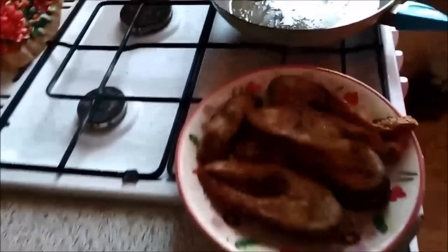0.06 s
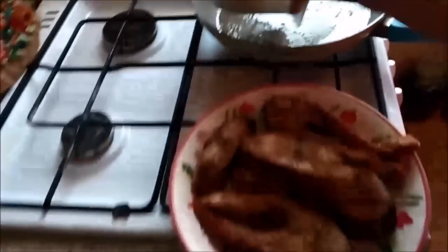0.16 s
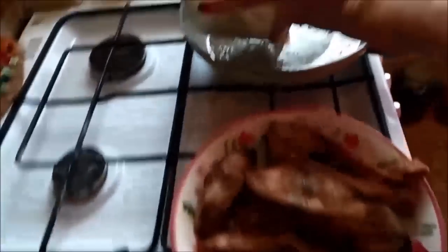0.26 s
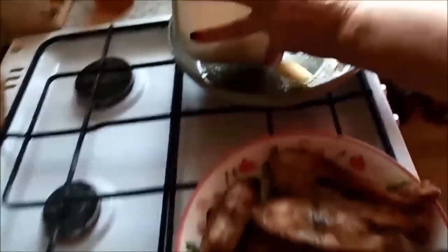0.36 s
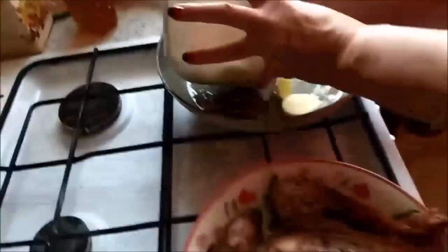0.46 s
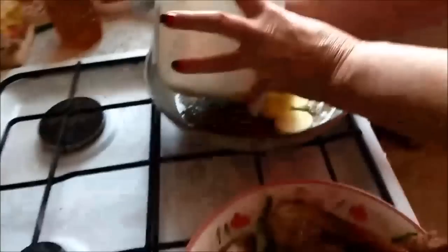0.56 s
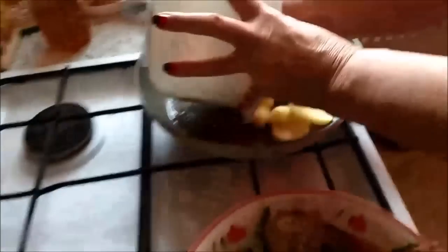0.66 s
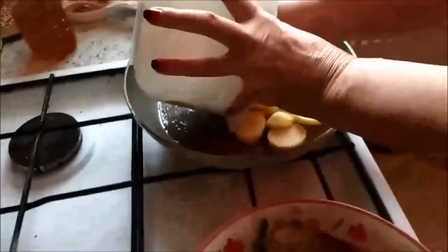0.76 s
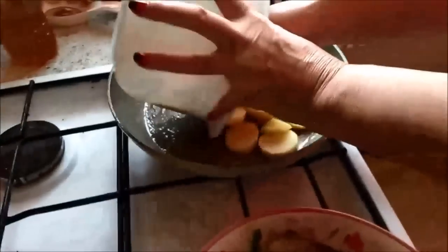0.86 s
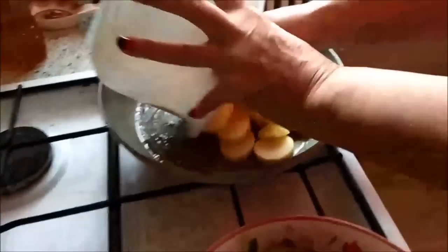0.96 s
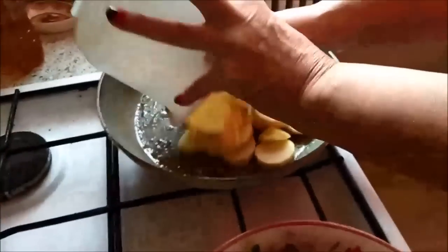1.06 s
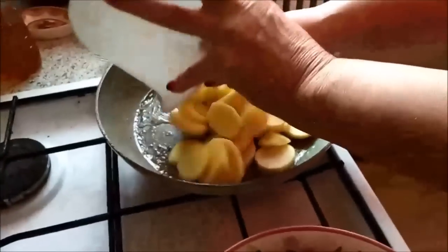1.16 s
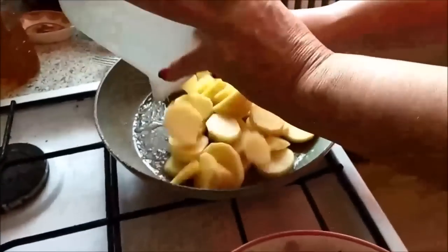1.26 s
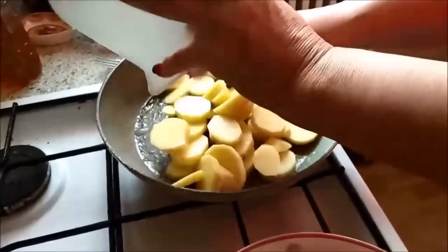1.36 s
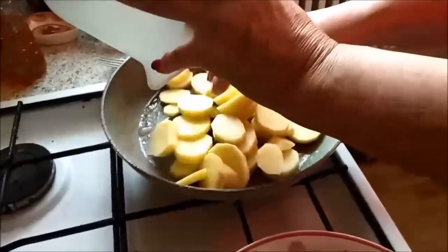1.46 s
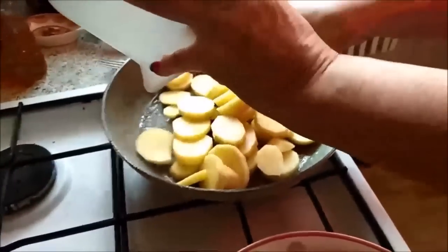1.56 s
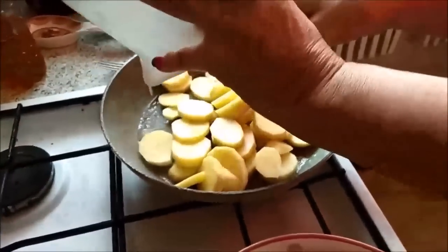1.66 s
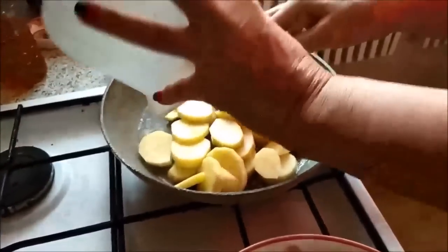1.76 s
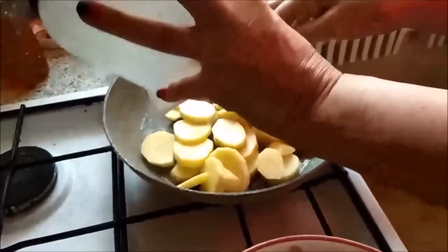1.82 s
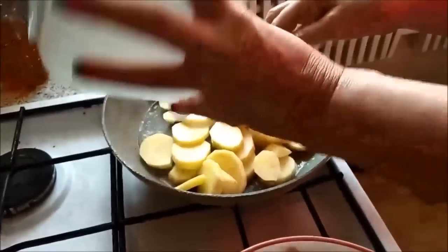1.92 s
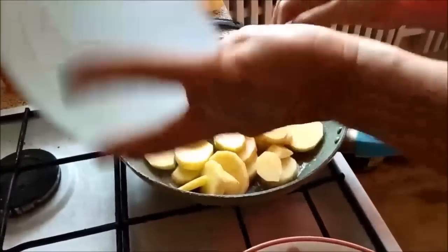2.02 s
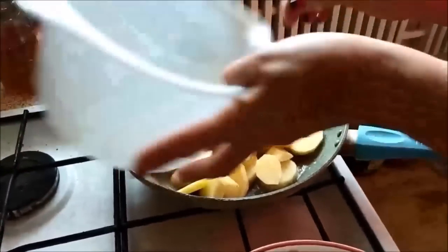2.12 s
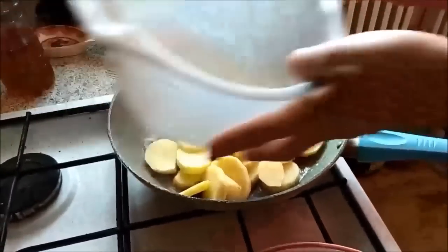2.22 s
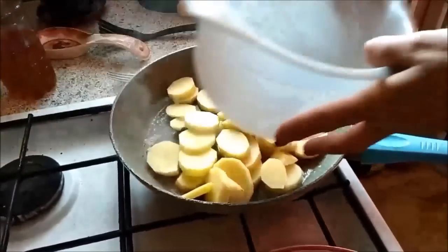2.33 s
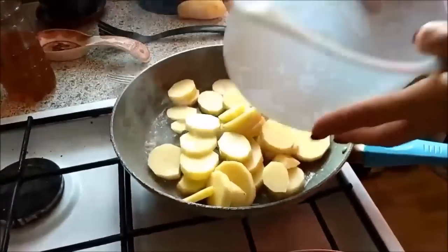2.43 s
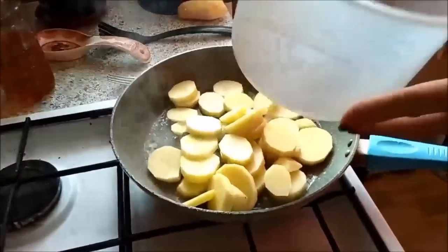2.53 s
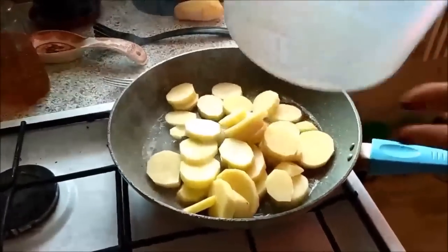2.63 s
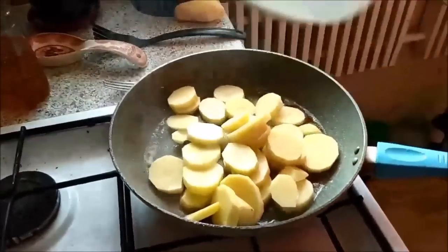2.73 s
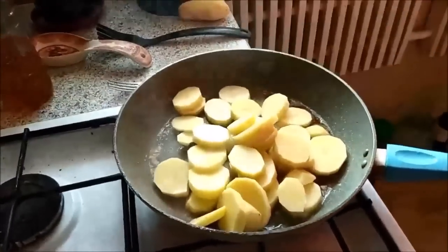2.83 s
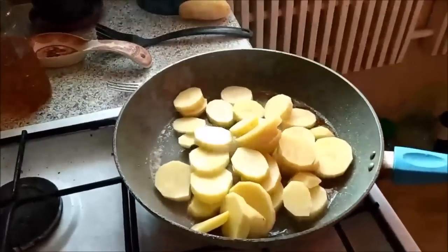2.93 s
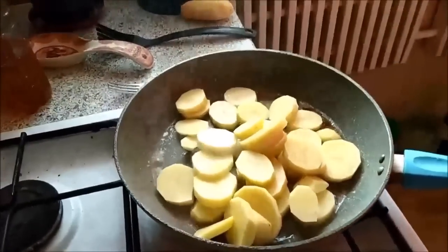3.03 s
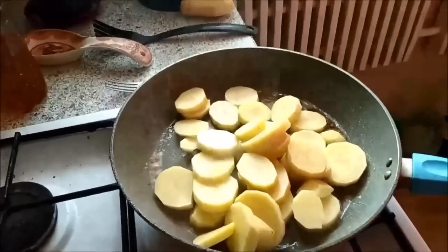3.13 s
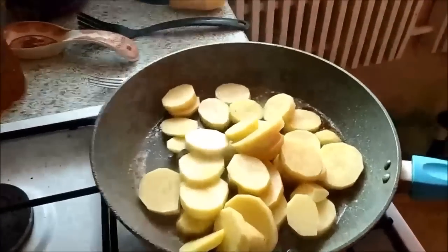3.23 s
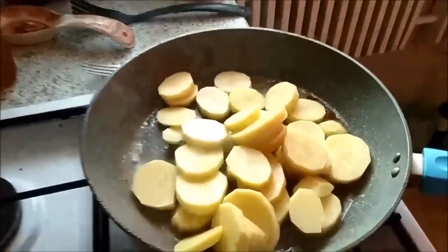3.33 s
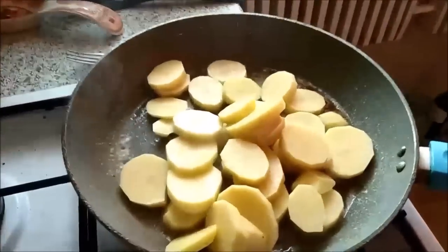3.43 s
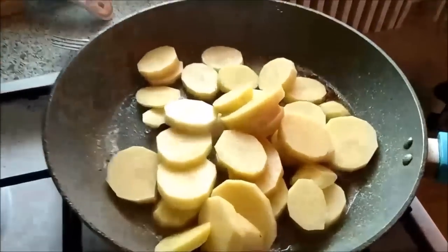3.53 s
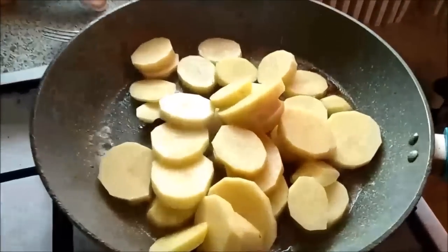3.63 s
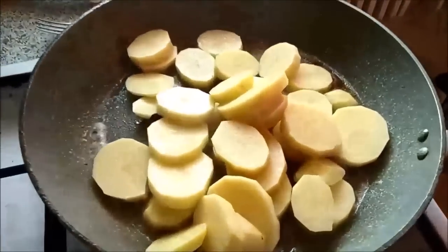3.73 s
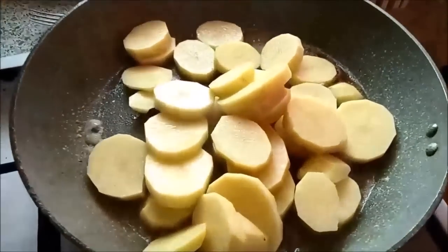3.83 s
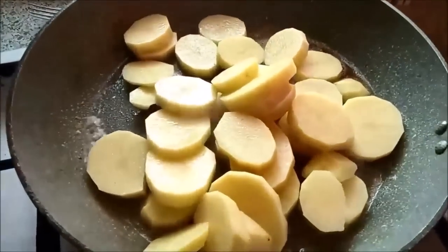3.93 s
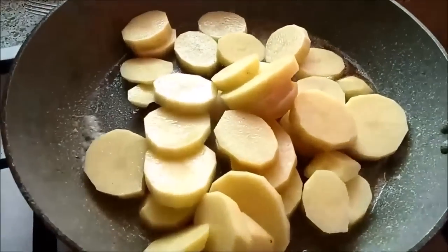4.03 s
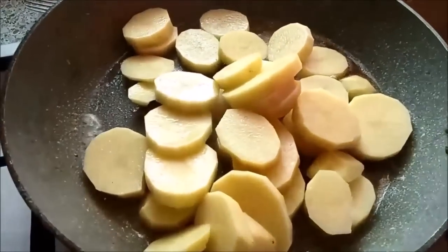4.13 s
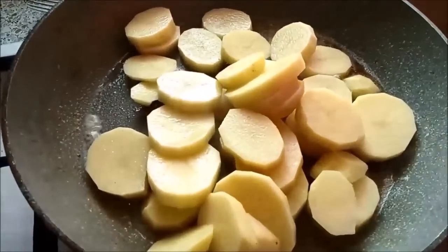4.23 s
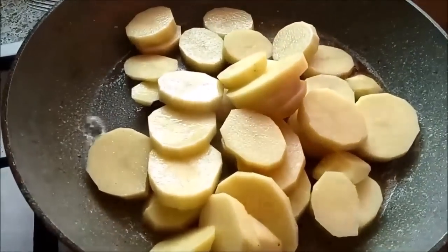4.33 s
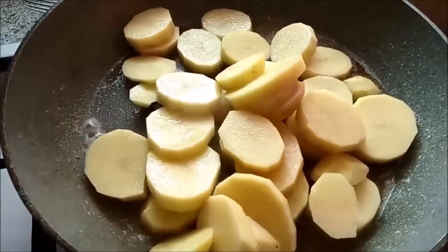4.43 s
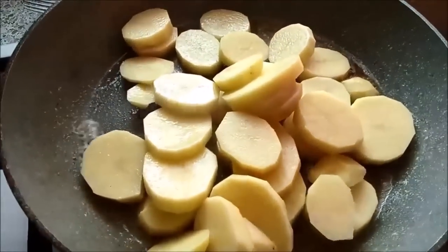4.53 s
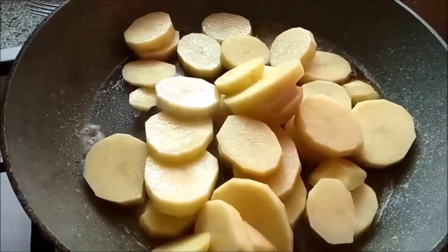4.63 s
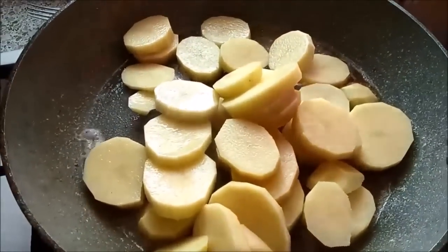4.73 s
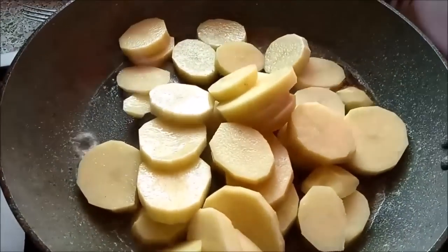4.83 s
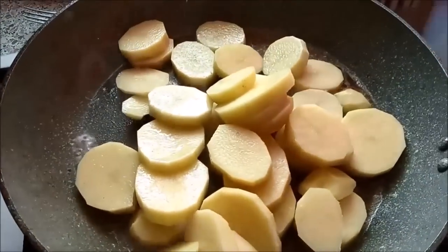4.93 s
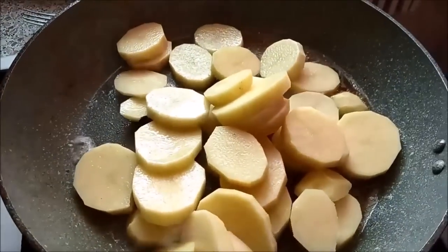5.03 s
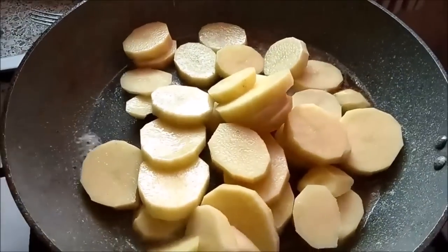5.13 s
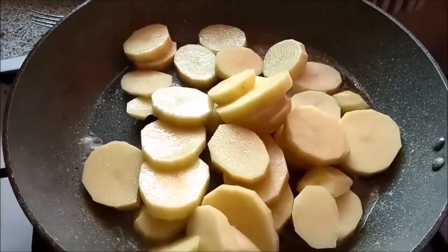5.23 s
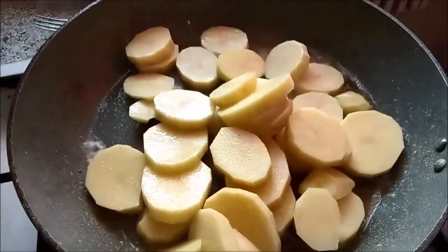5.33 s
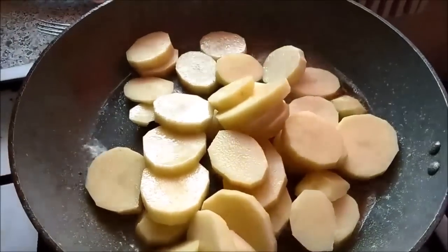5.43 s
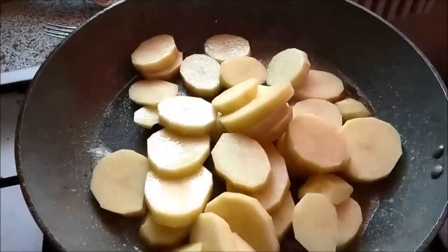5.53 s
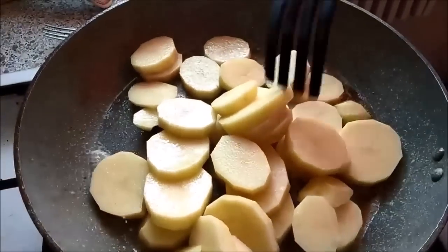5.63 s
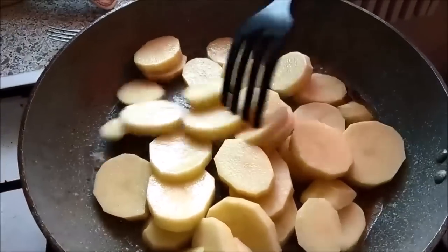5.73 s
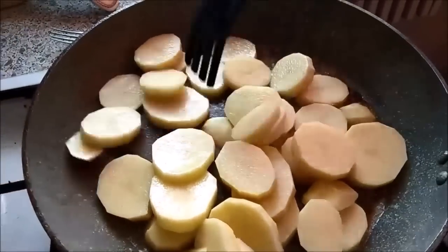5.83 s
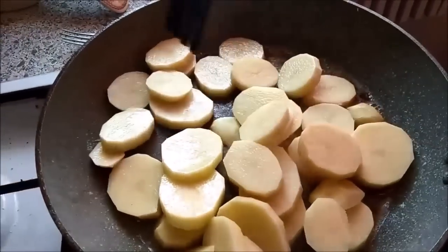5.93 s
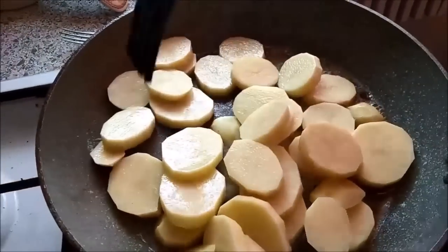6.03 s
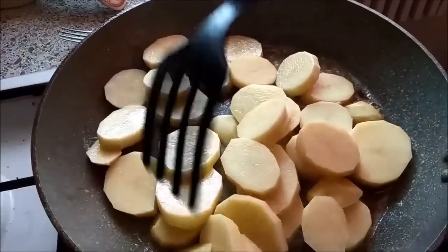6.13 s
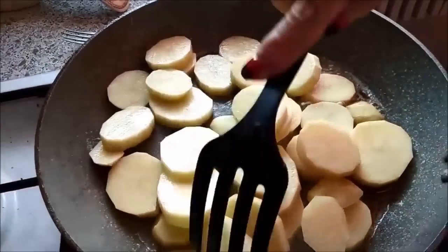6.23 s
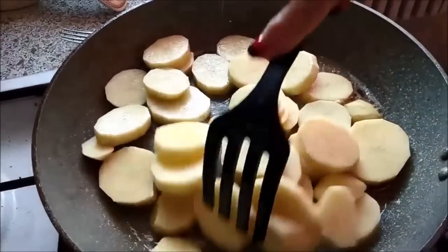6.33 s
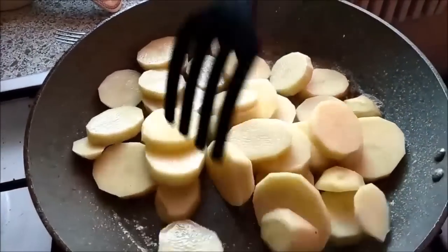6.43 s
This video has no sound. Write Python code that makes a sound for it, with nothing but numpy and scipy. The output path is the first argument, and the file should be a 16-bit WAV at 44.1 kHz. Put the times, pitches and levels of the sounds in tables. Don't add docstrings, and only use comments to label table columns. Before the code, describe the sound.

For the first half second there is only quiet kitchen room tone, with a faint low handling bump on the microphone at 0.4 s. From about 0.5 to 0.75 s the first potato slices land in the pan: a tight cluster of wet slaps and short, hollow metallic knocks, with a weak low rattle of the pan support. A thin, high fizz starts and climbs quickly. More, softer knocks and sliding tumbles come between 1.1 and 1.5 s, half covered by the rising hiss. By 1.7 s the sizzle is loud and bright, reaching its fullest around 3 to 3.6 s as the stereo microphone nears and coarser bubbling fills in beneath. Sharp spits and pops of oil scatter across both sides, strong near 2.5, 3.0, 4.3, 5.3 and 6.1 s. The frying stays dense, barely softer after 5 s, and is still going at the end, about 6.5 s.

```python
import sys
import numpy as np
from scipy import signal
from scipy.fft import rfft, irfft, next_fast_len
from scipy.io import wavfile
from scipy.ndimage import uniform_filter1d

SR = 44100
rng = np.random.default_rng(int(sys.argv[2]) if len(sys.argv) > 2 else 0)


def decibels_to_gain(level_db):
    exponent = np.asarray(level_db, float) / 20
    return 10 ** exponent


def wrap_up_sound(samples):
    columns = np.atleast_2d(samples).T
    tamed = np.clip(columns, -1, 1)
    steps = np.round(tamed * 32767).astype(np.int16)
    wavfile.write(sys.argv[1], SR, steps)


N = 285225

# t/s, peak level/dB, brightness/(dB/octave), left minus right/dB
LANDINGS = [(0.49, -27.5, -11, -2), (0.501, -20.5, -4, 8), (0.536, -18.5, -5.5, 3), (0.558, -32, -14, -1),
            (0.594, -28, -16, -4), (0.681, -30, -18, -9), (0.688, -20, -7.5, 4), (0.73, -26.5, -8, -5),
            (0.749, -29, -15, -2), (0.974, -48, 6, 0), (1.146, -31, -7, 0), (1.216, -28, -4.5, 1),
            (1.256, -30, -6, -2), (1.308, -25.5, -7, -3), (1.529, -30, -3, 5)]
# f/Hz, level/dB, T60/s
PAN_MODES = [(525, -10, 0.098), (624, -8, 0.035), (780, -3, 0.037), (863, -2.5, 0.055), (1082, 2, 0.051),
             (1173, -11, 0.057), (1647, -8.5, 0.071), (2090, -4, 0.04), (2300, 0.5, 0.064),
             (2425, 0.5, 0.055), (2660, -4, 0.038), (3310, -0.5, 0.07)]


def evened(x):
    return x / np.sqrt(np.mean(abs(x) ** 2) + 1e-20)


def read(points, hz):
    f, value = np.transpose(points)
    return np.interp(np.log(hz + 1), np.log(f + 1), value)


def add(mix, start_s, sound):
    part = mix[:, round(start_s * SR):][:, :sound.shape[1]]
    part += sound[:, :part.shape[1]]


def placed(sound, pan_db):
    return sound * decibels_to_gain(np.array([[pan_db / 2], [-pan_db / 2]]))


def coloured(x, gain):
    size = next_fast_len(N)
    return irfft(rfft(x, size) * gain(np.fft.rfftfreq(size, 1 / SR)), size)[..., :N]


def after_drops(db, t60_s):
    kicks = np.zeros(N)
    for s, peak_db, *_ in LANDINGS:
        kicks[round(s * SR)] = decibels_to_gain(2 * (peak_db + db))
    power = signal.lfilter([1], [1, -decibels_to_gain(-2 * 60 / (t60_s * SR))], kicks)
    return np.sqrt(power)


def bursts(per_s, spread_db, hiss):
    size_db = spread_db * np.minimum(rng.exponential(1, (2, N)), 4)
    pulses = decibels_to_gain(size_db) * rng.choice([-1., 1.], (2, N))
    happens = rng.random((2, N)) < per_s / SR
    return evened(pulses * happens) + hiss * rng.standard_normal((2, N))


def patchy(x, patch_db, flicker_db):
    frame = dict(nperseg=256, noverlap=128, window="cosine")
    z = signal.stft(x, **frame)[2]
    spots = rng.standard_normal(z.shape[1:])
    spots = uniform_filter1d(spots, size=6, axis=0)
    spots = evened(uniform_filter1d(spots, size=20, axis=1))
    flicker = evened(uniform_filter1d(rng.standard_normal(z.shape[2]), size=12))
    z = z * decibels_to_gain(patch_db * spots + flicker_db * flicker)
    return signal.istft(z, **frame)[1][:, :N]


def pair(x):
    # f/Hz, correlation/1
    likeness = [(60, 0.15), (180, 0.28), (550, 0.45), (1200, 0.57), (2500, 0.19), (4970, 0.067),
                (15000, 0.019)]
    lag_samples = 5
    shared = lambda hz: np.clip(read(likeness, hz), -1, 1)
    right = coloured(x[0], shared)
    right += coloured(x[1], lambda hz: np.sqrt(1 - shared(hz) ** 2))
    return np.array([np.roll(x[0], lag_samples), right])


def frying():
    # t/s, level/dB
    fry_levels = [(0.49, -47), (0.54, -41.5), (0.64, -38.5), (0.67, -39), (0.79, -31.5), (0.94, -27.5),
                  (0.99, -24), (1.16, -21), (1.23, -23), (1.28, -20), (1.66, -17.5), (2.3, -16.5),
                  (2.96, -15), (3.61, -14.5), (5.02, -16.5), (5.53, -16.5), (6.25, -16), (6.47, -17)]
    # t/s, settled/1
    settling = [(0.7, 0), (1.3, 0.17), (2.2, 0.4), (3.1, 0.64), (4.7, 0.95), (5.5, 0.93), (6.3, 0.78)]
    # f/Hz, density/(dB per Hz)
    sizzle = [(12, -36), (30, -24), (55, -16), (177, -19), (356, -17), (445, -15.5), (1090, -11.5),
              (2070, -5.5), (5000, -9), (7690, -6.5), (11400, 1.5), (13000, 1), (15100, -4.5), (15800, -6)]
    # f/Hz, left minus right/dB
    lean_points = [(60, 3.5), (180, 7), (550, 2), (1650, 4.5), (4970, -0.5), (15000, 1)]

    t = np.arange(N) / SR
    fizz_db = np.interp(t, *np.transpose(fry_levels), left=-99)
    settled = np.interp(t, *np.transpose(settling))
    blend = lambda fresh, late: fresh + (late - fresh) * settled

    splash_t60_s = 0.27
    boil = np.hypot(decibels_to_gain(fizz_db + blend(-16, -6)), after_drops(-26, splash_t60_s))
    wash = np.hypot(decibels_to_gain(fizz_db + blend(-25, -18)), after_drops(-23, splash_t60_s))

    above = lambda hz, edge_hz: 1 / np.sqrt(1 + (edge_hz / (hz + 1)) ** 8)
    below = lambda hz, edge_hz: np.sqrt(1 - above(hz, edge_hz) ** 2)
    halves = np.array([[.5], [-.5]])
    colour = lambda hz: decibels_to_gain(halves * read(lean_points, hz) + read(sizzle, hz))
    # source, band, level, patch/dB, flicker/dB
    layers = [(bursts(12000, 3.7, 1.67), lambda hz: above(hz, 3700), decibels_to_gain(fizz_db), .7, .6),
              (bursts(3000, 1.3, 1.36), lambda hz: above(hz, 1790) * below(hz, 5930), boil, .9, .9),
              (bursts(900, 1.6, 1.62), lambda hz: below(hz, 1560), wash, 1.2, .8)]
    out = 0
    for source, band, level, patch_db, flicker_db in layers:
        field = pair(patchy(source, patch_db, flicker_db))
        layer = coloured(field, lambda hz: band(hz) * colour(hz))
        out = out + evened(layer) * level * decibels_to_gain(3.0)

    coarse = coloured(out, lambda hz: (above(hz, 3200) * below(hz, 9000)) ** 2)
    out = out + coarse * (decibels_to_gain(blend(-0.5, 0.5)) - 1)
    return out * decibels_to_gain(halves * blend(1.2, -1.3))


def streaky(x):
    # f/Hz, depth/dB
    streak_depths = [(1000, .5), (2500, 3.2), (5000, 4), (8500, 4.5), (11500, 2.5), (14500, 4.5)]
    hz, _, z = signal.stft(x, SR, nperseg=2048, noverlap=1536)
    lines = rng.standard_normal(z.shape)
    lines = uniform_filter1d(lines, size=3, axis=1)
    lines = evened(uniform_filter1d(lines, size=9, axis=2))
    depth_db = read(streak_depths, hz)[:, None]
    mean_power_db = depth_db ** 2 * np.log(10) / 20
    z = z * decibels_to_gain(depth_db * lines - mean_power_db)
    return signal.istft(z, nperseg=2048, noverlap=1536)[1][:, :N]


def spits():
    # t/s, peak level/dB, f/Hz, left minus right/dB
    pockets = [(1.48, -7, 2500, 4), (1.7795, -9, 3800, -0.5), (1.8862, -35, 2790, 1.0),
               (1.9785, -27, 3900, 3.0), (2.1818, -11, 2640, 8), (2.441, -23, 3120, 1.5),
               (2.4964, -16, 1880, 0.5), (2.5173, -3.5, 3680, 13), (2.6096, -9, 2190, 9),
               (2.7468, -28, 4250, -2), (2.997, -3, 4100, 4), (3.0578, -2, 3260, 4), (3.204, -12, 1980, 4),
               (3.328, -11, 4020, 0.0), (3.393, -5, 4350, 5), (3.4592, -23, 2150, 5), (3.8313, -5, 2240, 6),
               (3.9126, -15, 2390, 1.5), (4.2728, 2, 3400, -8), (4.5796, -16, 3250, 3),
               (4.8051, -7, 3180, 1.5), (4.9503, -4, 3980, 2), (5.0171, -3, 3500, 1.0),
               (5.1917, -8, 2760, 0.5), (5.291, -2, 2110, 4), (5.3284, 2, 2980, -6), (6.0882, -2, 3570, 8),
               (6.1655, -1, 3300, -4), (6.2772, -20, 2970, 1.5), (6.3007, -7, 4050, 1.0)]
    out, t = np.zeros((2, N)), np.arange(800) / SR
    spray = rng.standard_normal((len(pockets), 2, len(t)))
    for (s, db, hz, pan_db), puff in zip(pockets, spray):
        pop = np.sin(2 * np.pi * hz * t * (1 + 30 * t)) * np.exp(-t / 0.0013)
        mist = 0.19 * puff * np.exp(-t / 0.0047)
        add(out, s, placed(decibels_to_gain(db - 12.0) * (pop + mist), pan_db))
    return out


def drops():
    out, t = np.zeros((2, N)), np.arange(6000) / SR
    hz, mode_db, t60_s = (c[:, None] for c in np.transpose(PAN_MODES))
    chance = rng.standard_normal((len(LANDINGS), len(PAN_MODES), 3))
    slap_band = signal.butter(2, [2 * 400 / SR, 2 * 3500 / SR], "band")
    slaps = signal.lfilter(*slap_band, rng.standard_normal((len(LANDINGS), len(t))))
    for (s, db, bright_db, pan_db), luck, slap in zip(LANDINGS, chance, slaps):
        level_db = mode_db + 3.0 * luck[:, :1] + bright_db * np.log2(hz / 1000) - 60 * t / t60_s
        mode_hz = hz * (1 + 0.029 * luck[:, 1:2])
        ring = decibels_to_gain(level_db) * np.sin(2 * np.pi * mode_hz * t + 2 * luck[:, 2:])
        knock = ring.sum(0) + 1.0 * slap * np.exp(-t / 0.006)
        knock = knock * (1 - np.exp(-t / 0.00071))
        add(out, s, placed(decibels_to_gain(db) * knock / abs(knock).max(), pan_db))
    return out


def tumble():
    hollow_hz = 820
    t = np.arange(3000) / SR
    ring = np.zeros(len(t))
    for hz, mode_db, t60_s in PAN_MODES:
        level_db = mode_db - 13.0 * abs(np.log2(hz / hollow_hz)) - 60 * t / t60_s
        ring += decibels_to_gain(level_db) * np.sin(2 * np.pi * hz * t)
    knocks = signal.oaconvolve(bursts(400, 2.7, 0.31), ring[None], axes=1)[:, :N]

    slide_s, slide_db = (0.78, 1.4, 2.2), (-55, -41.5, -51.5)
    now = np.arange(N) / SR
    sliding = decibels_to_gain(np.interp(now, slide_s, slide_db, left=-99, right=-99))
    shoved = after_drops(-13, 0.14) * (now > slide_s[0])
    return evened(knocks + 0.49 * knocks[::-1]) * np.hypot(sliding, shoved)


def grate():
    hum_hz, pour_start_s, pour_end_s, pour_db = 101, 0.41, 0.98, -60
    t = np.arange(N) / SR
    rattle = uniform_filter1d(rng.standard_normal(N), size=900)
    rattle = evened(uniform_filter1d(rattle, size=900))
    pouring = 1. * (t > pour_start_s) * (t < pour_end_s)
    resting = decibels_to_gain(pour_db) * uniform_filter1d(pouring, size=900)
    struck = uniform_filter1d(after_drops(-29, .2), size=400)
    level = np.hypot(resting, struck) * decibels_to_gain(4.5 + 4.9 * rattle)
    return level * np.sin(2 * np.pi * np.cumsum(hum_hz * (1 + 0.2 * rattle)) / SR)


def handling():
    # t/s, level/dB, f/Hz, length/s
    bump = (.402, -32.5, 19, .06)
    s, db, hz, length_s = bump
    out, t = np.zeros((2, N)), np.arange(int(3 * length_s * SR)) / SR
    thump = decibels_to_gain(db) * np.sin(2 * np.pi * hz * t) * np.exp(-(t / length_s) ** 2)
    add(out, s, placed(thump, 0))
    return out


def walls(x):
    t = np.arange(SR // 3) / SR
    taps = rng.choice([-1., 0, 1.], (2, len(t)), p=[.03, .94, .03])
    tail = taps * decibels_to_gain(-60 * t / 0.45) * (t > .004)
    return signal.fftconvolve(x, tail / np.linalg.norm(tail[0]), axes=1)[:, :N]


def kitchen():
    # f/Hz, density/(dB per Hz)
    room_colour = [(12, -7.5), (90, -27), (180, -29.5), (280, -36.5), (500, -39), (1000, -42), (1480, -45),
                   (2070, -39.5), (3720, -43), (5060, -37.5), (6500, -48), (7600, -29), (8400, -40),
                   (11000, -27.5), (14000, -40), (15600, -32.5)]
    level_db = -48.5 + 4.0
    x = patchy(rng.standard_normal((2, N)), 1.8, 0.13)
    x = x + 0.16 * x[::-1]
    return decibels_to_gain(level_db) * evened(coloured(x, lambda hz: decibels_to_gain(read(room_colour, hz))))


def scene():
    hits = drops() + spits()
    steady = streaky(frying() + kitchen())
    return steady + hits + decibels_to_gain(-4.0) * walls(hits) + tumble() + handling() + grate()


def top_cut(x):
    return signal.sosfilt(signal.butter(12, 16810, fs=SR, output="sos"), x)


def record(dry):
    # t/s, step/dB, recovery/s
    bias_jolts = [
        [(1.7425, -22, 0.03), (2.8435, -20, 0.026), (2.976, -13, 0.013), (3.844, -22.5, 0.03),
         (3.93, -21, 0.014), (4.715, -33, .04), (4.911, -22, 0.041), (5.5, -33, .015)],
        [(3.072, -17.5, .045), (4.5635, -31, 0.052), (4.595, -38, 0.027), (4.9105, -17.5, .045),
         (5.3105, -19, 0.052), (5.765, -20, 0.055)],
    ]
    edge_hz = 15830
    bias, t = np.zeros((2, N)), np.arange(SR // 3) / SR
    for side, rows in enumerate(bias_jolts):
        for s, db, recovery_s in rows:
            step = decibels_to_gain(db) * np.exp(-t / recovery_s) * (1 - np.exp(-t / 0.0007))
            add(bias[side:side + 1], s, (2 * side - 1) * step[None])
    clipped = np.clip(dry + bias, -.92, .92)
    limited = coloured(clipped, lambda hz: np.clip((edge_hz - hz) / 60, 0, 1))
    return top_cut(limited)


dry = scene()
out = record(dry)
wrap_up_sound(out)
```